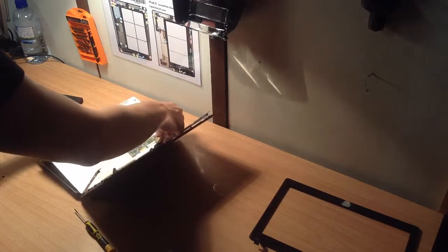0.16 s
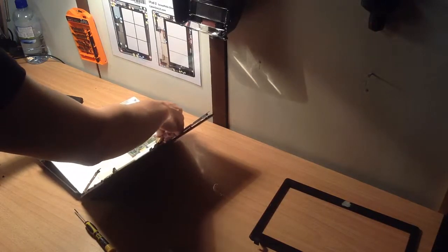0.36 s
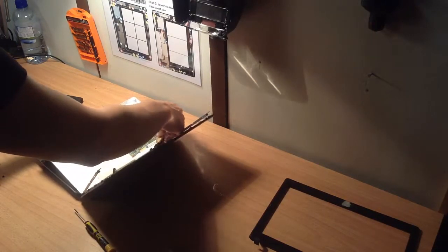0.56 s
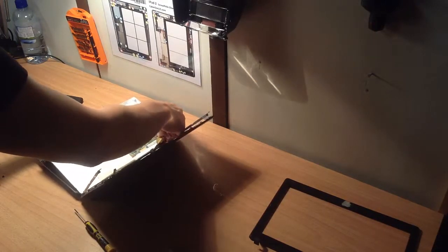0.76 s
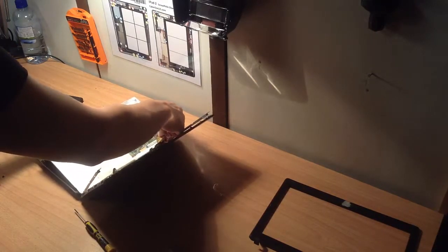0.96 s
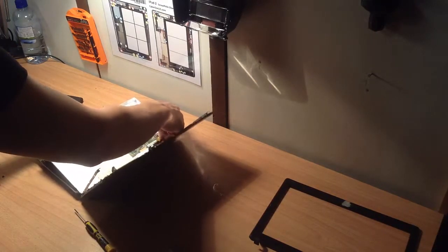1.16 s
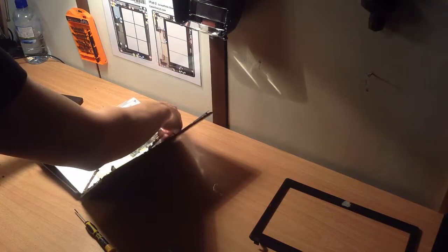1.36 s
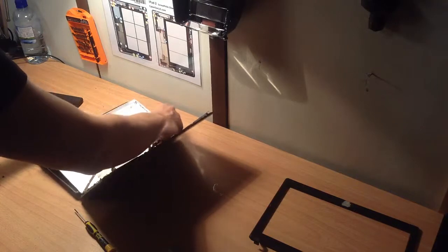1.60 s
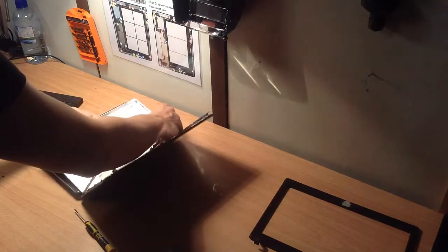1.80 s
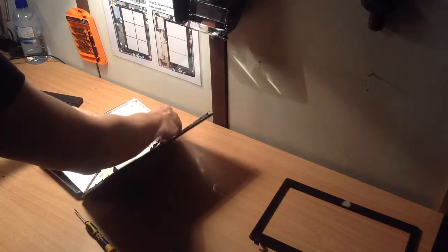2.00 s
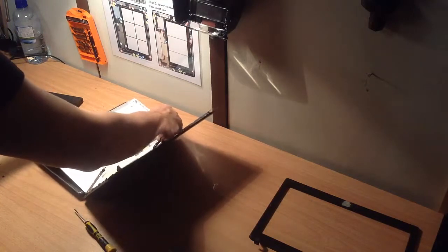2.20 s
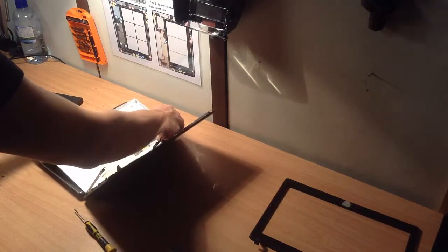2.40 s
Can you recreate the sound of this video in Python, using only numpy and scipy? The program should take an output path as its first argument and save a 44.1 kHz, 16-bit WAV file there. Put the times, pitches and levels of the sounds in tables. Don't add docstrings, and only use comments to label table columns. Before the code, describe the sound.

Tape being picked off a laptop lid in brittle snaps. A faint tap opens, then a loud flick at 0.23 s and bright tears at 0.43 and 0.69 s, over a low forearm rub strongest around 0.4-0.5 s. Medium snaps follow at 1.02, 1.34 and 1.59 s among faint scratches, fading by 1.9 s. A barely audible wooden creak comes near 2.1 s. Small echoing room, steady hiss.

```python
import sys
import numpy as np
from scipy import signal
from scipy.fft import rfft, irfft
from scipy.io import wavfile
from scipy.ndimage import uniform_filter1d

SR = 44100
rng = np.random.default_rng(int(sys.argv[2]) if len(sys.argv) > 2 else 0)


def put_to_file(sound):
    columns = np.atleast_2d(sound).T
    safe = np.clip(columns, -1, 1)
    whole_steps = np.round(safe * 32767)
    wavfile.write(sys.argv[1], SR, whole_steps.astype(np.int16))


def boost_factor(decibels):
    exponent = np.asarray(decibels, float) / 20
    return 10 ** exponent


N = 108045
LEAD_S = .05
LEAD = int(LEAD_S * SR)


def unit(x):
    return x / np.sqrt(np.mean(x ** 2))


def curve_db(points, hz):
    point_hz, point_db = np.array(points).T
    return np.interp(np.log(hz), np.log(point_hz), point_db)


def band(x, hz, width_hz):
    return signal.lfilter(*signal.iirpeak(min(hz, 18000), hz / width_hz, fs=SR), x)


def walk(rate, size=N):
    hold = int(SR / rate)
    levels = rng.standard_normal(size // hold + 1)
    return unit(uniform_filter1d(np.repeat(levels, hold), hold // 2)[:size])


def ring(modes, gains_db, detune, size=1024):
    t = np.arange(size) / SR
    hz, db, ms = np.array(modes, float).T[:, :, None]
    sines = np.sin(2 * np.pi * hz * (1 + detune[:, None]) * t)
    decay = np.exp(-np.log(1000) * t * 1000 / ms)
    return (boost_factor(db + gains_db[:, None]) * sines * decay).sum(axis=0)


# pitch in Hz, level in dB, time to fall 60 dB in ms.
FILM_MODES = [(2900, -10, 3), (4000, -9, 2.5), (5100, -4.5, 2.5), (6300, 1.5, 2.5), (7500, 4, 2),
              (9000, 5, 2), (10500, 3.5, 2), (12100, 5.5, 2), (13600, -2, 1.5), (14800, -3, 1.5)]
# pitch in Hz, level in dB, time to fall 60 dB in ms.
LID_MODES = [(650, -4, 12), (980, -3.5, 10), (1400, 0, 7), (1950, 1, 6), (2500, -3, 5)]
# pitch in Hz, level in dB.
FILM_COLOUR = [(1500, -40), (2400, -20), (3000, -9), (4500, -7), (6000, -1), (9000, -1), (12500, -4),
               (15500, -8)]
# pitch in Hz, level in dB.
LID_COLOUR = [(250, -30), (600, -4), (1200, -2), (2200, 0), (3500, -8), (6000, -30)]
SCATTER_DB, SNAP_DB = 6.5, 3.5
DETUNE = .07
GRIP_MS = .3
FOCUS_OCT, SMOOTH_HZ = .36, 900
LID_DB = 19


def pull(out, row, ms, energy_db, count, size=4096):
    s, db, hz, lid_db, focus_db = row
    modes = FILM_MODES + LID_MODES
    when = rng.random(count)
    strength = rng.standard_normal(count)
    vary = rng.standard_normal((count, 2, len(modes)))
    snaps = np.zeros(size)
    for k in range(count):
        snap = ring(modes, SCATTER_DB * vary[k, 0], DETUNE * vary[k, 1])
        snap_ms = GRIP_MS + (k + when[k]) / count * ms
        i = size // 2 + int(snap_ms * SR / 1000)
        snaps[i:i + len(snap)] += boost_factor(SNAP_DB * strength[k]) * (-1) ** k * snap

    spec = rfft(snaps)
    f = np.fft.rfftfreq(size, 1 / SR) + 1
    power = uniform_filter1d(np.abs(spec) ** 2, int(SMOOTH_HZ * size / SR))
    flat = spec / np.sqrt(power + 1e-9)
    focus = boost_factor(focus_db * np.exp(-.5 * (np.log2(f / hz) / FOCUS_OCT) ** 2))
    film = boost_factor(curve_db(FILM_COLOUR, f))
    lid = boost_factor(curve_db(LID_COLOUR, f) + LID_DB + lid_db)
    x = irfft(flat * focus * (film + lid), size)
    x *= boost_factor(db + energy_db) / np.sqrt(np.sum(x ** 2))

    i = int((s + LEAD_S) * SR)
    return out + np.pad(x, (i, len(out)))[size // 2:][:len(out)]


# start in seconds, peak level in dB,
# brightest film pitch in Hz, lid thud against snap in dB, how much that pitch stands out in dB.
EARLY_TEAR = (-0.04, -22, 7000, -22, 3)
# start in seconds, peak level in dB, brightest film pitch in Hz,
# lid thud against snap in dB, how much that pitch stands out in dB.
TEARS = [
    (0.4319, -10, 11900, -29, 4),
    (0.6898, -9, 12200, -32, 4),
    (0.9048, -37, 6640, -15, 4),
    (1.0246, -26, 8520, -20, 4),
    (1.5784, -37, 6210, -21, 4),
    (1.5903, -21, 7380, -31, 4),
    (1.7978, -32, 11600, -35, 4),
    (1.8374, -38, 6850, -28, 4),
]


def tears():
    out = np.zeros(N + LEAD)
    for row in [EARLY_TEAR] + list(TEARS):
        out = pull(out, row, ms=4.2, energy_db=12.5, count=14)
    return out


# pitch in Hz, level in dB, time to fall 60 dB in ms.
TAP_MODES = [(980, 0, 9), (1180, -3, 12), (1550, -8, 8), (2200, -5, 10)]


def lid_tap():
    out = np.zeros(N + LEAD)
    still = np.zeros(len(TAP_MODES))
    tap = ring(TAP_MODES, still, still)
    i = int((.001 + LEAD_S) * SR)
    out[i:i + len(tap)] += boost_factor(-39) * tap
    return out


# pitch in Hz, time to fall 60 dB in seconds, level in dB.
ROOM = [(300, .45, -5.5), (800, .42, 2.5), (1800, .36, 0.5), (4000, .35, 1.5), (8000, .29, 0.5),
        (14000, .22, 6)]
WALL_MS, WALL_DB = 4.3, -3.5
ROOM_DB, ROOM_RISE_MS, SPARSE_MS = -3.5, 6, 14
BENCH_ECHO_DB, BENCH_ECHO_MS = -25, 4


def room(size=26000):
    t = np.arange(size) / SR
    hz, t60, db = np.array(ROOM).T
    uneven = np.repeat(rng.standard_normal(size // 40 + 1), 40)[:size]
    grain = rng.standard_normal(size) * boost_factor(6 * np.exp(-t * 1000 / SPARSE_MS) * uneven)
    spec = rfft(grain)
    octave = np.log2(np.fft.rfftfreq(size, 1 / SR) + 1)
    tail = np.zeros(size)
    for k in range(len(hz)):
        share = np.interp(octave, np.log2(hz), np.arange(len(hz)) == k)
        tail += irfft(spec * share, size) * boost_factor(db[k] - 60 * t / t60[k])
    late_ms = np.clip(t * 1000 - WALL_MS, 0, None)
    out = tail * (1 - np.exp(-late_ms / ROOM_RISE_MS)) * boost_factor(ROOM_DB - 26)
    out += rng.standard_normal(size) * boost_factor(BENCH_ECHO_DB) * np.exp(-t * 1000 / BENCH_ECHO_MS)
    out[0] += 1
    out[int(WALL_MS * SR / 1000)] += boost_factor(WALL_DB)
    return out


# time in seconds, level in dB.
RUB = [(0.0, -67.5), (0.27, -74), (0.37, -44), (0.43, -40), (0.48, -49.5), (0.52, -45), (0.78, -56.5),
       (0.8, -65.5), (1.01, -67.5), (1.03, -62), (1.12, -71.5), (1.19, -55), (1.25, -68.5), (1.62, -65.5),
       (1.96, -75), (2.1, -65), (2.36, -74), (2.45, -69)]
# pitch in Hz, width in Hz, level in dB.
BENCH = [(170, 50, -7), (250, 60, -2), (340, 70, -1), (400, 60, -5), (500, 90, -5), (830, 300, -9.5)]
SKIN_HZ, SKIN_WIDTH_HZ, SKIN_DB = 1600, 1800, -11


def forearm_rub():
    s, db = np.array(RUB).T
    drag = rng.standard_normal(N) * boost_factor(2 * walk(70))
    wood = np.zeros(N)
    for k, (hz, width_hz, gain_db) in enumerate(BENCH):
        hum = band(band(drag, hz, width_hz), hz, 2 * width_hz)
        wood += (-1) ** k * boost_factor(gain_db) * unit(hum)
    skin = unit(band(band(drag, SKIN_HZ, SKIN_WIDTH_HZ), SKIN_HZ, 2 * SKIN_WIDTH_HZ))
    level = boost_factor(np.interp(np.arange(N) / SR, s, db))
    return level * (unit(wood) + boost_factor(SKIN_DB) * skin)


# pitch in Hz, level in dB per Hz.
HISS = [(35, -45), (60, -15), (241, 1), (530, -5), (685, -3), (824, -7), (2080, -11), (11900, -12),
        (15300, -18)]


def hiss():
    hz, db = np.array(HISS).T
    f = np.log(np.fft.rfftfreq(N, 1 / SR) + 1)
    colour = boost_factor(np.interp(f, np.log(hz), db))
    return boost_factor(-63) * unit(irfft(rfft(rng.standard_normal(N)) * colour, N))


# start in seconds, peak level in dB, brightest film pitch in Hz,
# lid thud against snap in dB, how much that pitch stands out in dB.
FLICKS = [
    (0.2329, -12, 5750, -48, 7),
    (1.3379, -26, 8790, -33, 7),
    (1.3974, -42, 8750, -13, 7),
    (1.5065, -42, 6490, -19, 7),
    (1.5564, -33, 8760, -19, 7),
    (1.9285, -47, 13600, -20, 7),
]


def flicks():
    out = np.zeros(N + LEAD)
    for row in FLICKS:
        out = pull(out, row, ms=1.5, energy_db=9, count=4)
    return out


# start in seconds, peak level in dB, brightest pitch in Hz,
# lid thud against snap in dB, how much that pitch stands out in dB.
SCRATCHES = [
    (0.9198, -39, 3150, -22, 10),
    (1.2685, -53, 2880, -22, 10),
    (1.3104, -48, 3300, -22, 10),
    (1.3304, -43, 2640, -22, 10),
    (1.3962, -47, 1520, -22, 10),
    (1.5329, -48, 902, -22, 10),
]


def scratches():
    out = np.zeros(N + LEAD)
    for row in SCRATCHES:
        out = pull(out, row, ms=6, energy_db=13.5, count=12)
    return out


# time in seconds, pitch in Hz, level in dB.
CREAK = [
    (2.04, 240, -90),
    (2.08, 295, -70),
    (2.115, 312, -60.5),
    (2.15, 305, -68),
    (2.2, 290, -80),
]


def bench_creak():
    t = np.arange(N) / SR
    s, hz, db = np.array(CREAK).T
    pitch = np.interp(t, s, hz) * (1 + .015 * walk(60))
    phase = 2 * np.pi * np.cumsum(pitch) / SR
    overtones = np.sin(2 * phase) + np.sin(3 * phase)
    return boost_factor(np.interp(t, s, db, -120, -120)) * (np.sin(phase) + boost_factor(-12.5) * overtones)


def scene():
    tape = tears() + lid_tap() + flicks() + scratches()
    heard = signal.fftconvolve(tape, room())[LEAD:][:N]
    return (heard + forearm_rub() + bench_creak() + hiss())[None]


def band_limit(x):
    return signal.sosfilt(signal.butter(12, 16450, fs=SR, output="sos"), x)


def record(dry):
    bass_cut = signal.butter(2, 60, "high", fs=SR, output="sos")
    top_cut = signal.ellip(8, .2, 45, 15250, fs=SR, output="sos")
    mix = signal.sosfilt(top_cut, signal.sosfilt(bass_cut, dry))
    return band_limit(mix)


dry = scene()
out = record(dry)
put_to_file(out)
```